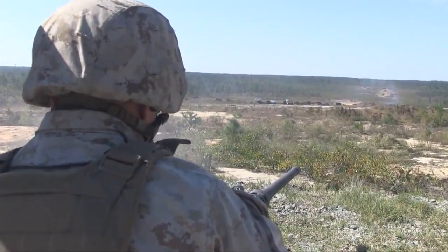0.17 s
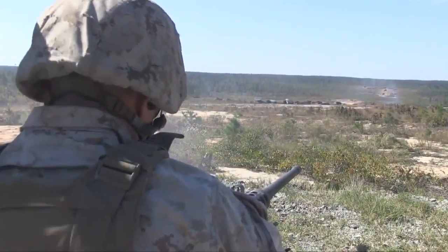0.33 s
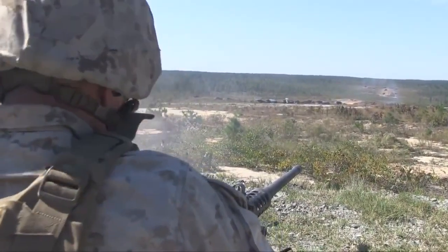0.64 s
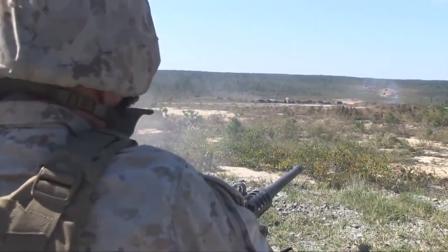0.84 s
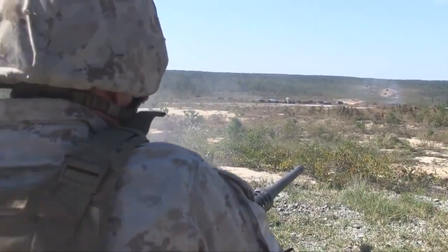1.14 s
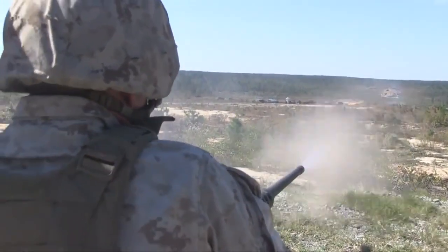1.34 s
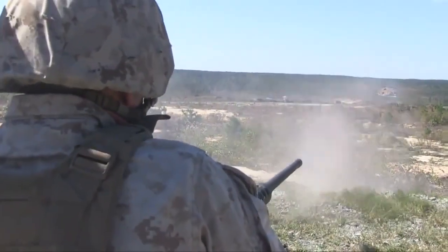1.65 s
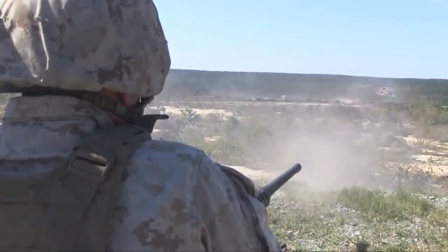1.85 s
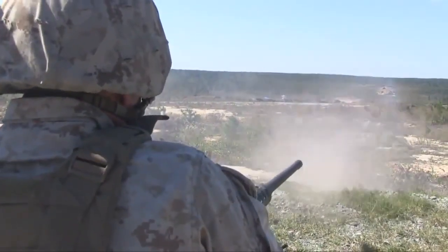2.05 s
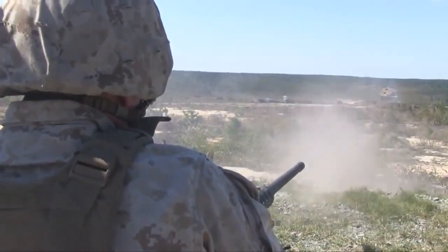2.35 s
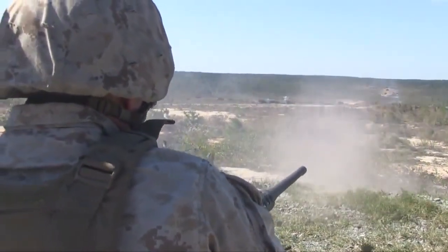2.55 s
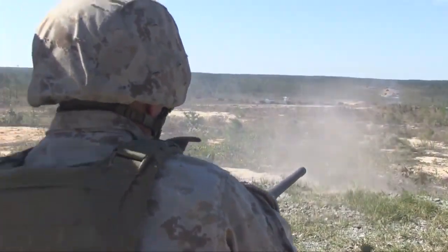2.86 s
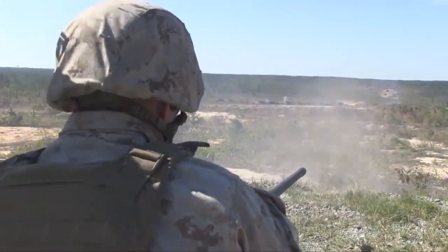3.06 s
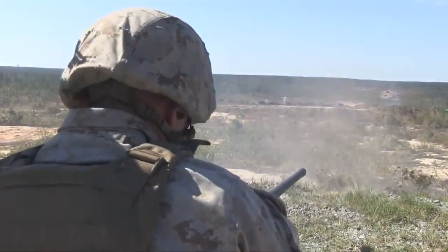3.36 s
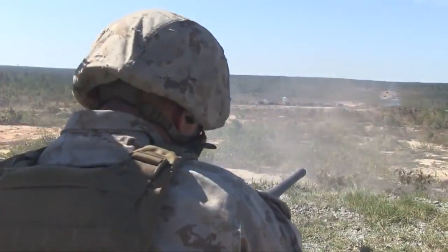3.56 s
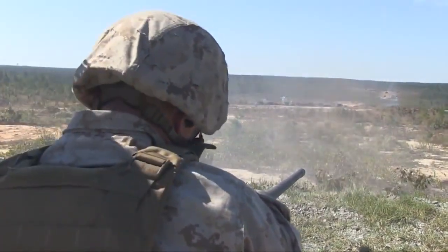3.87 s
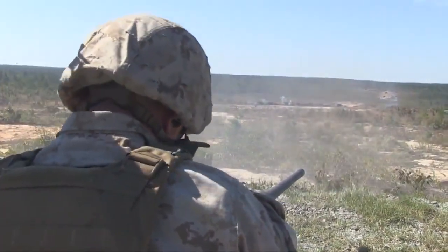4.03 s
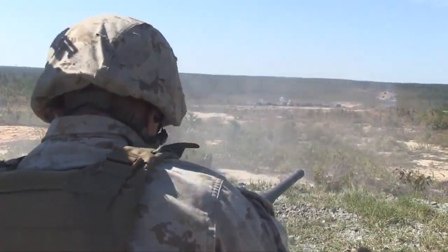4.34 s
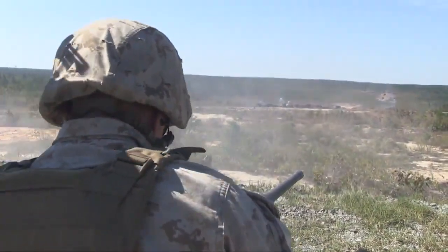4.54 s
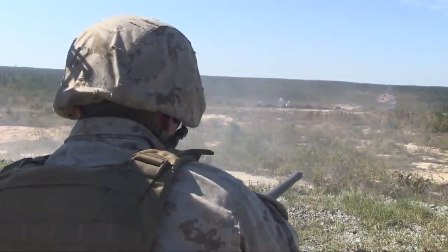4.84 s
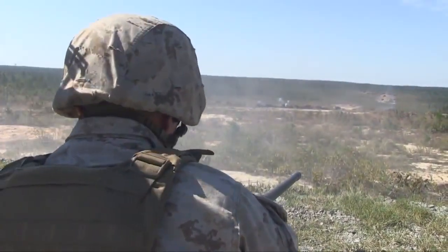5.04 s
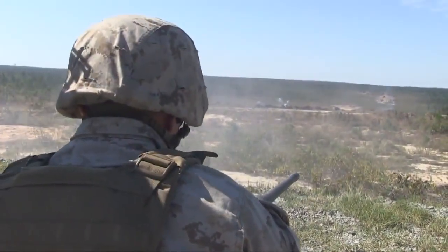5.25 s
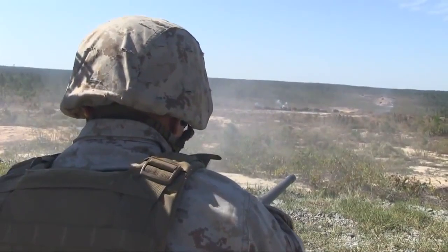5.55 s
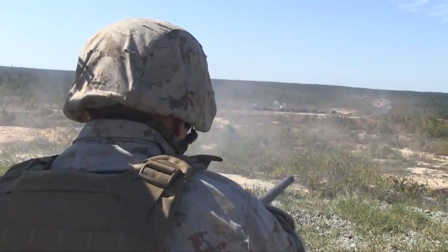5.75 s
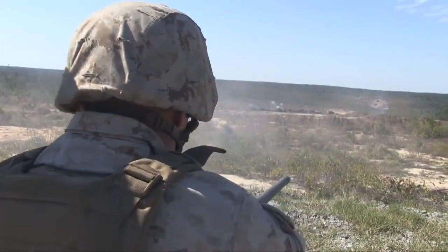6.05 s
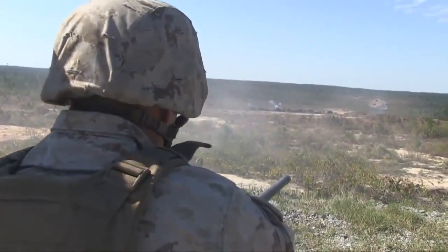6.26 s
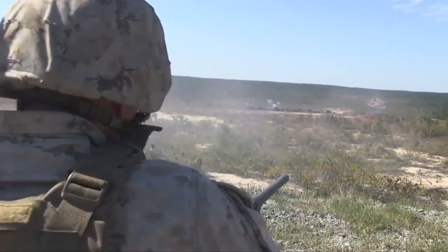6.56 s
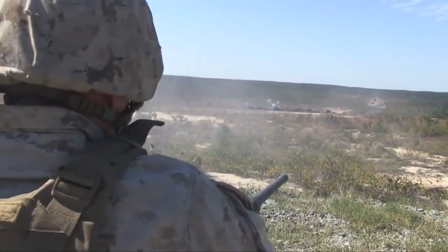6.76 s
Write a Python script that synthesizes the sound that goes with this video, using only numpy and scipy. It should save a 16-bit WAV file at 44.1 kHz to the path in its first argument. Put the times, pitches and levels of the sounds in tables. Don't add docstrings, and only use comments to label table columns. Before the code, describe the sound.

Heavy machine guns hammer in separate bursts on an open range, nearest ones overloading the microphone, with rolling echoes off distant woods between them.

```python
import sys
import numpy as np
from scipy import signal
from scipy.fft import rfft, irfft, next_fast_len
from scipy.io import wavfile
from scipy.ndimage import uniform_filter1d, map_coordinates

SR = 44100
rng = np.random.default_rng(int(sys.argv[2]) if len(sys.argv) > 2 else 0)


def int16_out(signal):
    q = np.round(np.clip(np.atleast_2d(signal).T, -1, 1) * 32767)
    wavfile.write(sys.argv[1], SR, q.astype(np.int16))


def gain_from_decibels(decibels):
    exponent = np.asarray(decibels, float) / 20
    return 10 ** exponent


N = 304290
EARLY = .01
T = np.arange(SR // 4) / SR
CLOCK = np.arange(7000) / 1000

AHEAD_SHOTS = [1.328, 1.4546, 1.5955, 1.719, 1.842, 1.989, 2.110, 2.247, 2.375, 2.506]
BESIDE_SHOTS = [4.0138, 4.1276, 4.2414, 4.3541, 4.4838, 4.5976, 4.7208]
SECOND_SHOTS = [1.9312, 2.0208, 2.110, 2.1992, 2.2864, 2.375, 2.4632, 2.551, 2.6386]
THIRD_SHOTS = [.0425, 3.0126, 3.1087, 3.2046, 3.2984, 3.3925, 3.4882, 3.5806, 3.676, 3.7677, 3.8609]
FOURTH_SHOTS = [3.2237, 3.3707, 3.5473]
FIFTH_SHOTS = [6.3776, 6.4656, 6.5522, 6.6383, 6.7263, 6.8142]
# centre_hz, width_hz, start_ms, length_ms, level_db over overload, t60_s after that
AHEAD_GAS = [(5000, 11000, -6, 2.5, -7, .01), (1046, 1700, 0, 6, 3, .02),
             (4630, 16000, 0.5, 12.4, 4.5, 0.012), (5000, 9000, 23.5, 5.9, -21, 0.021),
             (3900, 18000, 23, 3.5, -8.5, 0.013), (574, 1700, 7, 11.6, -1.5, 0.098),
             (389, 173, 23, 11, -3, 0.083), (300, 280, 12.5, 7.8, -12, .4), (798, 450, 14, 17, -12.5, 0.34),
             (188.4, 160, 7, 27, -9.5, 0.34), (2440, 5500, 1, 7.1, -17.5, 0.6),
             (9000, 9000, 17.5, 35, -34.5, 0.64), (68.6, 61, -4.5, 12, -8.5, 0.087)]
BESIDE_GAS = [(4950, 9000, -2.5, 4, -16, 0.0092), (740, 1600, -0.5, 2.5, 4.5, 0.063),
              (5000, 11000, -0.5, 5.3, -7, 0.018), (4470, 7900, 8, 4.5, -13, 0.01),
              (4820, 26000, 28.5, 10, -20.5, 0.046), (490, 505, 5.5, 14, -5, 0.29),
              (201, 106, -3, 22, -5, 0.22), (2420, 2800, 23, 7.7, -22.5, 0.48),
              (8770, 8000, 22.5, 41.6, -30.5, 0.31), (70, 130, -4.5, 12, -14, 0.086)]
SECOND_GAS = [(2970, 4500, -5, 3.5, -14.5, 0.0092), (2420, 7900, 0, 0.67, 1.5, 0.011),
              (390, 319, -5, 35, -12.5, 0.23), (2500, 1700, 11, 5, -28, 0.085)]
THIRD_GAS = [(2500, 6500, -1, 3, -23.5, 0.015), (417, 330, -7, 6.7, -21.5, 0.59),
             (890, 680, 0.5, 4.4, -16.5, 0.037), (1536, 3600, 5, 10, -41.5, 0.17),
             (82.7, 150, 0, 8.4, -12, 0.038)]
FIFTH_GAS = [(2800, 4500, 4.2, 1.6, -16, .012), (480, 400, 9, 30, -22, .5), (4000, 6000, -1, 3, -22, .01),
             (2200, 2500, 22, 6, -31, .05), (1500, 2000, 8, 30, -33, .2), (75, 80, 0, 8, -9, .1)]
# front_hz, front_db over overload, front_t60_s, swing_hz, swing_db, swing_t60_s,
# left_lead_s, air_lowpass_hz
SECOND_BLAST = (340, 21.2, 0.0083, 160, 7, 0.021, 0.000035, 3600)
THIRD_BLAST = (252, 14.8, .013, 158, 22.5, 0.01, 0.00011, 1740)
FOURTH_BLAST = (240, 12.6, 0.011, 165, 8.9, 0.04, 0.00011, 1500)
FIFTH_BLAST = (300, 18.6, 0.012, 176, 4.13, .028, 0.00011, 2000)
# delay_ms, share (below 0 = inverted)
SECOND_ECHOES = [(5.2, .2), (9, .1)]
THIRD_ECHOES = [(4.4, .1), (5.6, -.1), (7, .06), (10.5, .015), (17.5, .05), (28, .04), (35.5, -.04)]
FOURTH_ECHOES = [(4.4, .3), (8.3, .2)]
FIFTH_ECHOES = [(5.1, .12), (5.8, -.2), (9.6, -.08), (13.8, .07), (21.8, .05), (23, -.04), (29.8, -.07),
                (33.5, -.07), (36.5, -.08), (61.8, -.04), (72.3, -.07)]


def guns():
    mix = np.zeros((2, N))
    line = [
        (AHEAD_SHOTS, AHEAD_GAS, 0),
        (BESIDE_SHOTS, BESIDE_GAS, 0),
        (SECOND_SHOTS, SECOND_GAS, blast(SECOND_BLAST, SECOND_ECHOES)),
        (THIRD_SHOTS, THIRD_GAS, blast(THIRD_BLAST, THIRD_ECHOES)),
        (FOURTH_SHOTS, THIRD_GAS, blast(FOURTH_BLAST, FOURTH_ECHOES)),
        (FIFTH_SHOTS, FIFTH_GAS, blast(FIFTH_BLAST, FIFTH_ECHOES)),
    ]
    for times, layers, front in line:
        shots = gas(layers, len(times)) + front
        for start_s, shot in zip(times, shots):
            add(mix, start_s - EARLY, shot)
    return mix


def blast(shape, echoes):
    front_hz, front_db, front_t60, swing_hz, swing_db, swing_t60, lead_s, air_hz = shape
    age = T - EARLY
    copies = sum(share * ringing(age - ms / 1000, 1.2 * front_hz, .014) for ms, share in echoes)
    copies = lowpassed(copies, 1300)
    front = gain_from_decibels(front_db) * (ringing(age, front_hz, front_t60) + copies)
    build = np.clip(age / 0.0037, 0, 1)
    after = gain_from_decibels(swing_db) * ringing(age - .0004, swing_hz, swing_t60) * build
    wave = lowpassed(after - front, air_hz)
    ears_s = lead_s * np.array([[.5], [-.5]])
    return filtered(wave, lambda f: np.exp(2j * np.pi * f * ears_s))


def ringing(age, hz, t60):
    return (age >= 0) * gain_from_decibels(-60 * np.abs(age) / t60) * np.cos(2 * np.pi * hz * age)


def gas(layers, count):
    shots = np.zeros((count, 2, len(T)))
    for centre_hz, width_hz, start_ms, length_ms, level_db, t60 in layers:
        same = np.clip(.9 - centre_hz / 2500, 0, 1)
        repeated = np.sqrt(same) * rng.standard_normal((2, len(T)))
        noise = repeated + np.sqrt(1 - same) * rng.standard_normal(shots.shape)
        band = lambda f: 1 / (1 + ((f * f - centre_hz ** 2) / (f * width_hz + 1)) ** 2)
        age = T - EARLY - start_ms / 1000
        rise_s = max(1 / centre_hz, -start_ms / 1000)
        fade_db = 60 * np.maximum(age - length_ms / 1000, 0) / t60
        shape = np.clip(age / rise_s, 0, 1) * gain_from_decibels(level_db - fade_db)
        strength = gain_from_decibels(rng.normal(0, 1, (count, 1, 1)))
        shots += strength * shape * stereo(noise, band)
    return shots


# first_s, last_s, far_woods_db, near_slopes_db, brightness_db
BURSTS = [
    (-.6, .03, -16, -22.5, -20),
    (1.344, 2.55, -18, -14.5, -21.5),
    (2.998, 3.86, -30, -21.5, -24.5),
    (4.02, 4.743, -17, -15.5, -21.5),
    (6.32, 6.805, -18, -29.5, -17),
]
# level_db over the feed, fade_db_per_s
FAR = [
    (-1, 4.5),
    (-4.5, 6),
    (-14, 13.5),
]
# from_s, to_s, depth_db
HUSH = [
    (-.2, 0.08, 8.5),
    (1.36, 1.498, 5),
    (2.52, 2.67, 4.5),
    (3.04, 3.522, 7),
    (4.047, 4.8, 11),
    (6.38, 6.85, 26),
]
# frequency_hz, density_db per Hz
BOOM = [(24, -55), (40, -43), (91, -6), (187, 1.5), (299, -2.5), (367, -6.5), (477, -8.5), (700, -21),
        (910, -52.5), (1540, -120)]
BODY = [(240, -41), (400, -11), (564, -6), (684, 0), (1270, -2.5), (2170, -8), (2400, -8.5), (2630, -10.5),
        (3390, -14), (4500, -47), (5850, -59), (9900, -120)]
HISS = [(2060, -17.5), (3500, 1.5), (3740, -1.5), (4290, -2.5), (8000, -24), (10400, -60.5), (17600, -120)]
AIR = [(3240, -23), (5500, -1.5), (6530, -2), (11800, -13.5), (15000, -14.5)]


def woods():
    far_db, near_db, bright_db = np.transpose(BURSTS)[2:]
    hush_in_s, hush_out_s = .1, 0.47
    hushes = [db * ramp(a, hush_in_s) * (1 - ramp(b, hush_out_s)) for a, b, db in HUSH]
    hush_db = np.max(hushes, axis=0)
    hush_shares = (0.51, 1, 0.81)
    boom, body, hiss = [echo(far_db + db, fade, hush_db=share * hush_db)
                        for (db, fade), share in zip(FAR, hush_shares)]
    near = echo(near_db, fade=70)
    air = echo(near_db + bright_db + 1.5, fade=27, builds=.15)
    lump = map_coordinates(rng.standard_normal(N // 1000 + 4), [np.arange(N) / 1000])
    mix = np.hypot(boom, near) * rush(BOOM, gain_from_decibels(1.3 * lump), patchy_db=0.7)
    mix += body * rush(BODY, gain_from_decibels(1.1 * lump), patchy_db=1.17)
    mix += hiss * rush(HISS, gain_from_decibels(1.7 * lump), patchy_db=0.6)
    mix += air * rush(AIR, gain_from_decibels(0.9 * lump), patchy_db=4.5)
    return mix


def echo(levels_db, fade, builds=1, hush_db=0):
    power = 0
    for (first, last, *_), db in zip(BURSTS, levels_db):
        fading = gain_from_decibels(db - fade * np.maximum(CLOCK - last, 0))
        power = power + ramp(first, builds * (last - first)) * fading ** 2
    return smooth(np.sqrt(power) * gain_from_decibels(-hush_db))


def rush(spectrum, lumps, patchy_db):
    z = signal.stft(rng.standard_normal((2, N)), nperseg=256)[2]
    field = uniform_filter1d(rng.standard_normal(z.shape[1:]), 4, 0)
    field = uniform_filter1d(field, 8, 1)
    pair = signal.istft(z * gain_from_decibels(patchy_db * unit(field)), nperseg=256)[1][:, :N]
    return stereo(pair * lumps, lambda hz: gain_from_decibels(along(spectrum, hz)))


# start_s, thud_db, crack_db over thud
SLAPS = [(.2676, -34, -8), (.4562, -19, 0), (.6305, -25, -6), (0.7042, -17, 1), (.8595, -24, 0),
         (1.043, -17, -8), (1.14, -27, 0), (1.2172, -8.5, -5), (1.303, -22, 0), (2.7698, -21, 3),
         (2.8169, -8.5, -17), (2.8974, -18.5, 4), (4.9005, -18.5, -7), (5.0268, -13, -2),
         (5.1247, -14, -10), (5.309, -9.5, -15), (5.44, -12, -25), (5.5114, -18, -13), (5.733, -18, -14),
         (6.0425, -20, -13.5)]


def slaps():
    mix, t = np.zeros((2, N)), T[:SR // 12]
    draw = lambda: rng.standard_normal((len(SLAPS), 2, len(t)))
    cracks = stereo(draw(), lambda f: f / 3500 / (1 + (f / 4500) ** 6))
    knocks = stereo(draw(), lambda f: 1 / (1 + ((f - 1100) / 800) ** 4))
    for (start_s, thud_db, sharp_db), crack, knock in zip(SLAPS, cracks, knocks):
        thud = gain_from_decibels(thud_db + 4 - 60 * t / .04) * np.sin(2 * np.pi * 270 * t)
        knock_db = -14.5 + 0.58 * thud_db - 3
        puff = gain_from_decibels(thud_db + sharp_db - 4) * crack + gain_from_decibels(knock_db) * knock
        puff = puff * gain_from_decibels(-60 * t / .045)
        add(mix, start_s, puff * np.clip(t / .003, 0, 1) + thud * np.clip(t / .0008, 0, 1))
    return mix


# start_s, pitch_hz, level_db, t60_s
BRASS = [
    (2.652, 6350, -37, .25),
    (2.795, 6400, -44, .12),
    (1.9, 6300, -35, .15),
]


def brass():
    mix = np.zeros((2, N))
    for start_s, pitch_hz, level_db, t60 in BRASS:
        ring = gain_from_decibels(level_db - 60 * T / t60) * np.sin(2 * np.pi * pitch_hz * T)
        add(mix, start_s, np.ones((2, 1)) * ring)
    return mix


# frequency_hz, density_db per Hz
BREEZE = [(20, -25.5), (45, -5), (80, 0), (130, -7.5), (260, -40), (600, -120)]


def breeze():
    gusts = map_coordinates(rng.standard_normal(N // 15000 + 4), [np.arange(N) / 15000])
    noise = gain_from_decibels(2.8 * gusts) * rng.standard_normal((2, N))
    return gain_from_decibels(-46) * stereo(noise, lambda hz: gain_from_decibels(along(BREEZE, hz)))


# frequency_hz, likeness (0 to 1)
ALIKE = [(60, 1), (180, 1), (550, 0.9), (1650, 0.57), (4970, 0.26), (15000, 0.08)]


def stereo(pair, colour):
    turn = lambda hz: np.arccos(np.clip(along(ALIKE, hz), .1, .96)) / 2
    mid = filtered(pair[..., 0, :], lambda hz: colour(hz) * np.cos(turn(hz)))
    side = filtered(pair[..., 1, :], lambda hz: colour(hz) * np.sin(turn(hz)))
    return unit(np.stack([mid + side, mid - side], axis=-2))


def unit(x):
    return x / np.sqrt(np.mean(x ** 2) + 1e-20)


def along(points, hz):
    f, v = np.transpose(points)
    return np.interp(np.log(hz + 1), np.log(f + 1), v)


def filtered(x, response):
    m = next_fast_len(x.shape[-1] + 4096)
    return irfft(rfft(x, m) * response(np.fft.rfftfreq(m, 1 / SR)), m)[..., :x.shape[-1]]


def lowpassed(x, top_hz):
    return filtered(x, lambda f: 1 / (1 + 1j * f / top_hz) ** 2)


def add(mix, start_s, sound):
    part = mix[:, round(start_s * SR):][:, :sound.shape[1]]
    part += sound[:, :part.shape[1]]


def ramp(start, length):
    return np.clip((CLOCK - start) / length, 0, 1)


def smooth(control):
    return np.interp(np.arange(N) / SR, CLOCK, control)


# start_s, dive_db, low_until_s
DIVES = [
    (1.35, 9, 3.05),
    (3.23, 1.8, 3.55),
    (4.029, 3, 4.8),
    (6.385, 6, 7),
]


def gain_db():
    dive_s, climb_db_per_s, stays_db = 0.059, 16.5, 1.72
    dips = []
    for start_s, db, until_s in DIVES:
        climbing = db * (1 - ramp(start_s + dive_s, db / climb_db_per_s))
        held = stays_db * (1 - ramp(until_s, 0.2))
        dips.append(ramp(start_s, dive_s) * np.maximum(climbing, held))
    return smooth(-np.max(dips, axis=0))


def scene():
    background = woods() + brass() + slaps() + breeze()
    return guns() + background / gain_from_decibels(gain_db())


def roll_off(x):
    return signal.sosfilt(signal.butter(12, 16090, fs=SR, output="sos"), x)


def record(dry):
    flat = .9 * dry / (1 + np.abs(dry) ** 4) ** (1 / 4)
    droop = filtered(flat, lambda f: 1j * f / (45 + 1j * f) / (1 + (f / 14000) ** 4))
    balance_db = np.array([[.4], [-.4]])
    gained = np.clip(droop * gain_from_decibels(gain_db() + balance_db), -1, 1)
    band = filtered(gained, lambda f: 1 / (1 + (f / 15350) ** 60))
    return roll_off(band)


dry = scene()
out = record(dry)
int16_out(out)
```